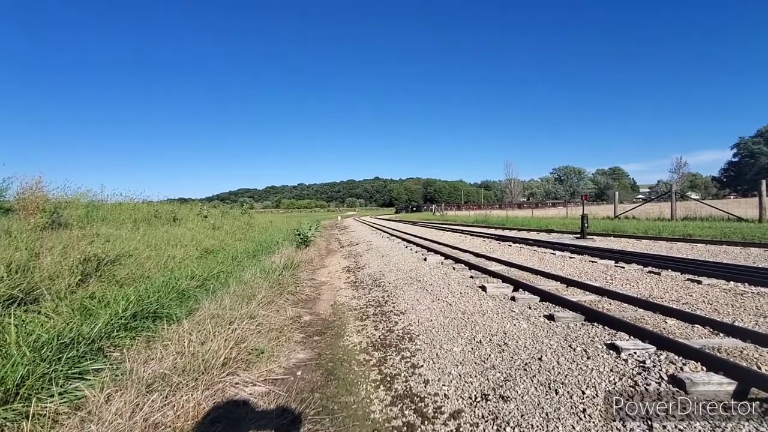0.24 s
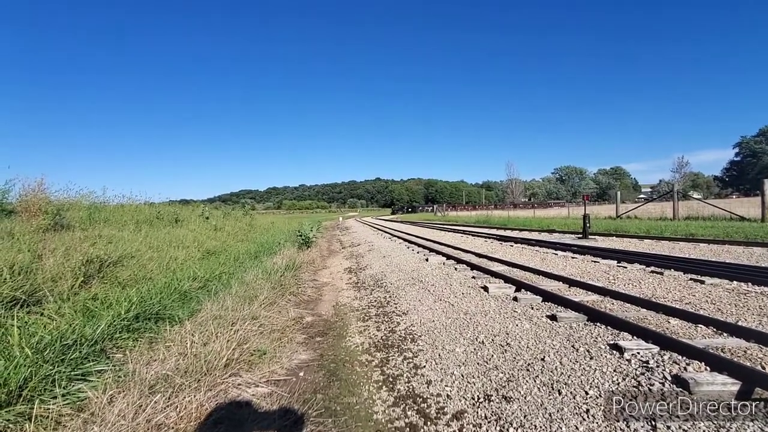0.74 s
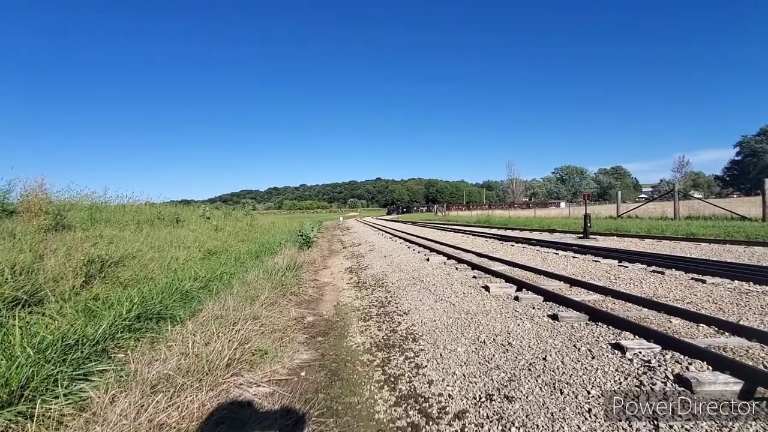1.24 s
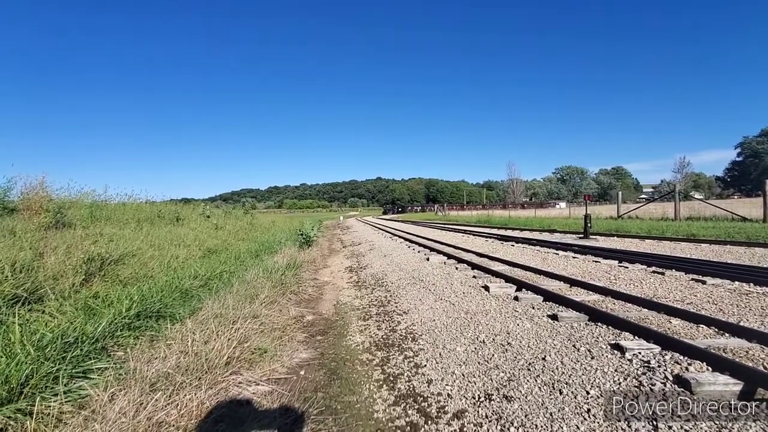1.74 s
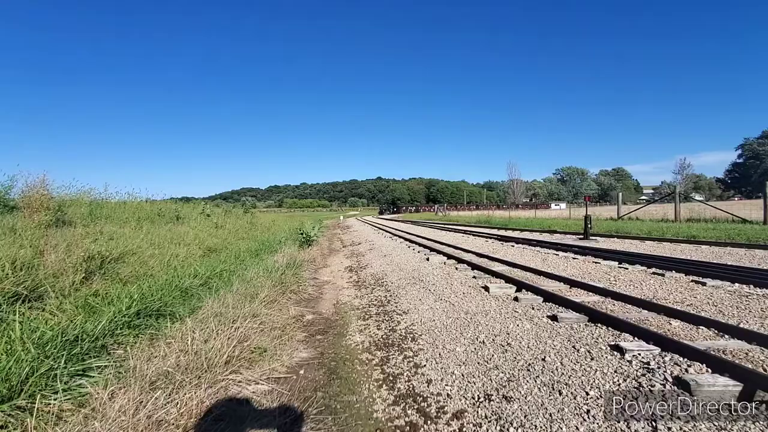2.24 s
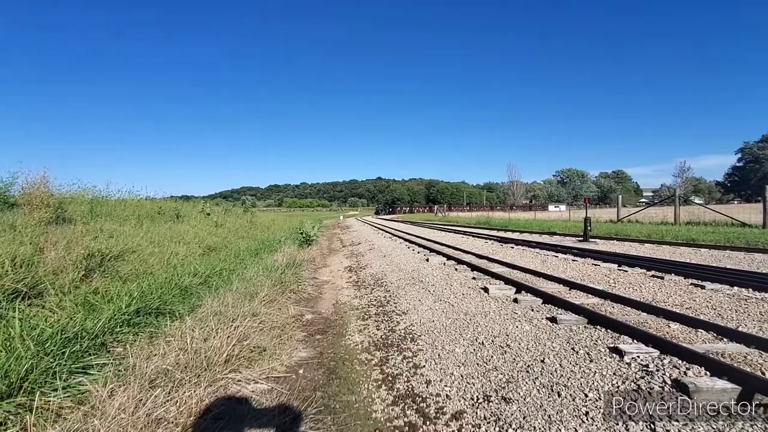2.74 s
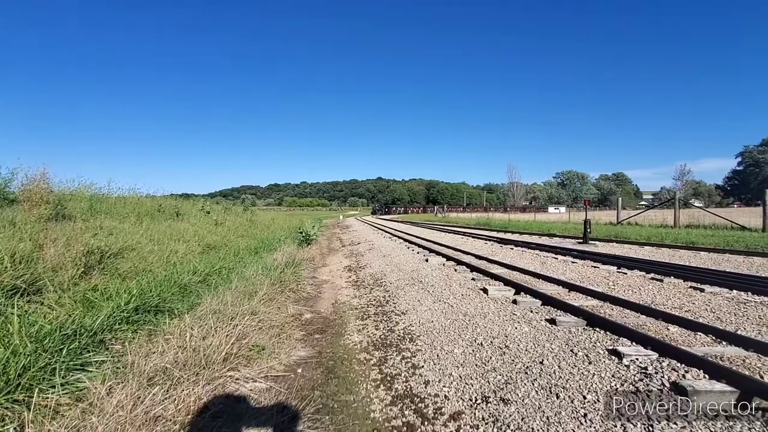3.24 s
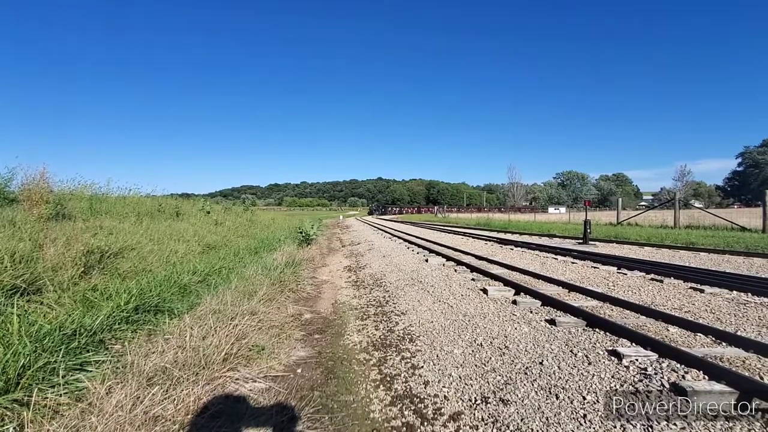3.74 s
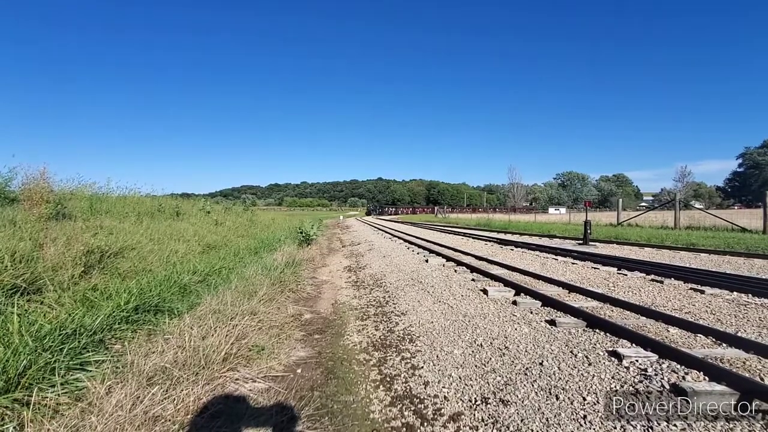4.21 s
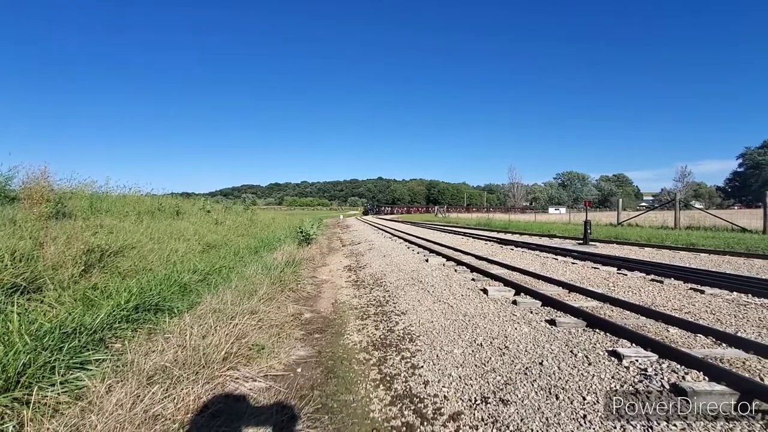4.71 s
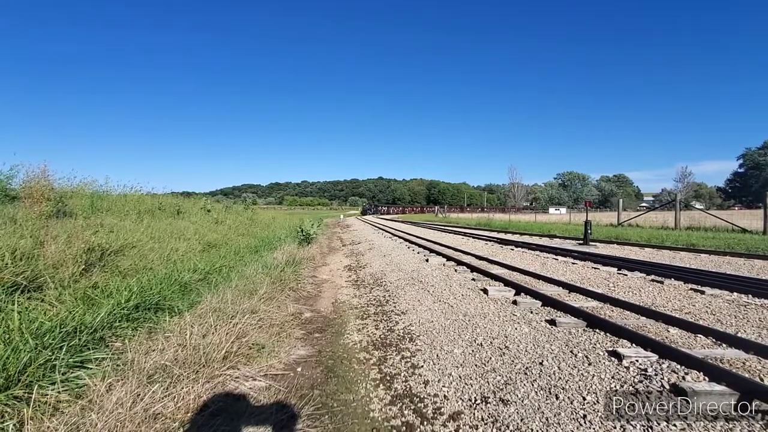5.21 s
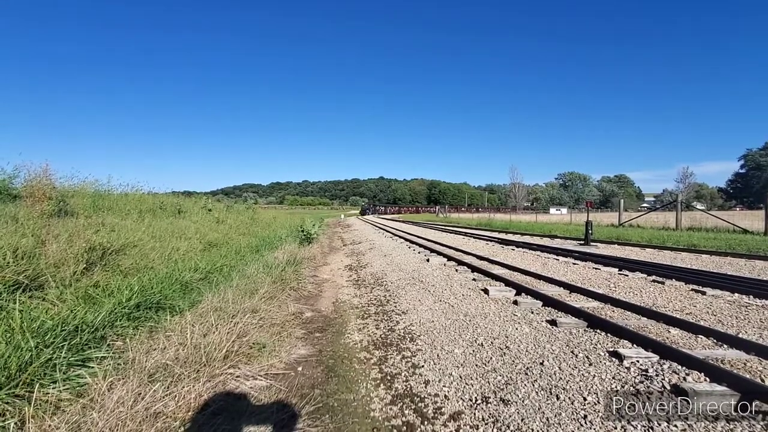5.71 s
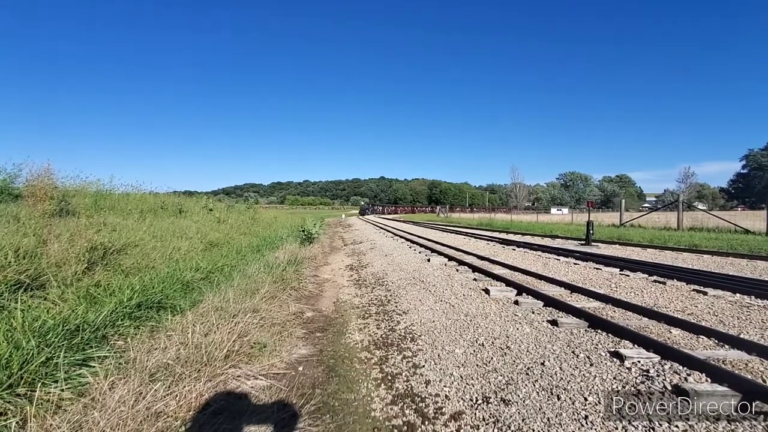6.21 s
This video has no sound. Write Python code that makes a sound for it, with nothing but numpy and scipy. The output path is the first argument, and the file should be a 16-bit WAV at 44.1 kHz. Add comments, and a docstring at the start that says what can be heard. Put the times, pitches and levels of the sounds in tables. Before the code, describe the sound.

Fast, soft chuffing of a far-off steam locomotive grows louder with hissing steam, over low wind thumps, rustling grass, chirps and thin insect trills.

```python
"""A steam train rolls and puffs from the start, about ten puffs a second and slowing a little: shaped noise.
Early on, a gust of noise rustles the grass and dies away over a faint low drone, which later drops.
Birds chip and whistle throughout, and insects trill until nearly five seconds: short gliding tones.
From about one second, bursts of low noise are wind striking the two microphone ports, hardest near four.
After four seconds the train nears: its puffs grow and noisy spurts and leaks of steam come through."""
import sys
import numpy as np
from scipy import signal
from scipy.fft import rfft, irfft
from scipy.io import wavfile
from scipy.ndimage import uniform_filter1d

SR = 44100
rng = np.random.default_rng(int(sys.argv[2]) if len(sys.argv) > 2 else 0)


def to_wav(sig):
    """Store sig (one row per channel, or 1-D mono) as 16-bit WAV at the path in sys.argv[1].

    Samples outside -1..1 are clipped; the rate is SR.
    """
    pcm = np.clip(np.atleast_2d(sig), -1, 1) * 32767
    pcm = np.round(pcm).astype(np.int16)
    wavfile.write(sys.argv[1], SR, pcm.T)  # frames by channels


N = 284886
TIME = np.arange(N) / SR  # [s]

# low drone, one hum a row: (pitch [Hz], width [Hz], level [dB])
DRONE_HUMS = [(75, 18, -41.5), (146, 10, -47.5), (312, 12, -51)]
# fading of the drone: (time [s], gain [dB])
DRONE_FADE = [(1.2, 0), (2.7, -2), (3.3, -12)]

# quiet sound of the field: (frequency [Hz], relative strength [dB per Hz])
FIELD_SPECTRUM = [(100, 10), (500, 3), (1200, -24), (2300, -51), (3000, -17.5), (4500, -18), (6200, -24),
                  (8300, -11), (9500, -25), (12000, -36), (15500, -22)]
# likeness of the field at the two ports: (frequency [Hz], likeness [0-1])
FIELD_LIKENESS = [(100, 0.88), (700, 0.93), (1500, 0.25), (3000, 0.066), (15000, .05)]

# start times of a near bird's double chips: (time [s])
CHIP_TIMES = [0.411, 1.105, 1.534, 2.536, 2.997, 3.511, 4.015, 4.41, 4.81, 5.217, 5.655]
CHIP_DB = -44.5  # the second chip of each pair
# distant bird notes:
# (time [s], length [s], start pitch [Hz], end pitch [Hz], level [dB], lead at the left port [ms])
BIRD_NOTES = [(0.75, .034, 3130, 3130, -36.5, 0.1), (.792, 0.024, 3150, 3100, -40, 0.16),
              (0.853, .03, 3030, 2970, -43, 0.23), (0.887, 0.034, 3420, 3580, -40, .18),
              (0.996, 0.031, 1320, 1334, -44, 0), (1.16, 0.026, 3070, 3170, -38.5, 0.1),
              (1.443, .049, 3470, 3485, -44, 0.19), (1.503, 0.05, 3706, 3694, -45.5, 0.044),
              (1.569, .046, 1300, 1330, -48, 0.037), (1.903, 0.014, 2920, 3100, -44.5, .1),
              (2.117, 0.054, 3560, 3390, -50, .18), (2.294, .043, 3500, 3510, -56.5, 0.063),
              (2.787, 0.038, 3730, 3630, -52, .03), (2.837, .057, 3220, 3000, -56, .13),
              (2.935, .064, 3690, 3640, -45.5, 0.08), (3.016, 0.083, 3590, 3670, -49, .16),
              (3.455, .06, 5000, 3600, -59, 0.026)]

# two insects: (stroke length [s], start pitch [Hz], end pitch [Hz], level before chance and fading [dB])
INSECTS = [(.028, 7800, 6950, -55), (.021, 8400, 8000, -56)]
# bouts of trilling: (which insect [0 or 1], first stroke [s], end [s], rate [strokes per s])
TRILLS = [(0, .035, 1.65, 15.85), (0, 2.056, 4.6, 15.8), (1, 1.195, 2.08, 16.35), (1, 2.75, 4.9, 16.75)]
# how a stroke fades, and how strokes differ by chance; detune and stretch are shares of pitch and length
STROKE_FADE_DB, STROKE_JITTER_S, STROKE_UNEVEN_DB = -11, 0.0018, 2.2
STROKE_DETUNE, STROKE_STRETCH = 0.007, 0.13

# steady wind: (time [s], level [dB], likeness of the two ports [0-1], left over right [dB])
WIND_COURSE = [(0, -39, 0.65, 0), (1, -37, 1, -0.5), (2.1, -36.5, 0.53, 1), (2.8, -35.5, 1, 0),
               (3.2, -43, 0, 19), (3.6, -39.5, 0.1, -1), (4, -42, 0.06, -28.5), (4.25, -42.5, 0, 3.5),
               (5.3, -37, 0, 0), (6.15, -50, .05, 26), (6.46, -34, 0.3, -11)]
# wind buffets: (time of the peak [s], level [dB], length [s], left over right [dB])
BUFFETS = [(0.988, -31.5, 0.078, 0), (1.577, -22, 0.027, 2), (1.927, -24.5, 0.034, 3),
           (2.102, -34.5, 0.09, 10), (2.246, -30.5, 0.081, -1), (2.398, -37, 0.035, 6),
           (2.77, -41, 0.06, 3), (3.17, -28.5, 0.043, 1), (3.329, -36, 0.034, 11), (3.45, -30, 0.028, 8),
           (3.539, -26, 0.12, -1), (3.726, -26.5, 0.081, 3), (3.976, -21, 0.028, 0.5),
           (4.017, -20.5, 0.056, 0.5), (4.1, -19, 0.045, -3), (4.471, -29.5, 0.1, 0),
           (4.845, -21, 0.043, 3), (5.164, -22, 0.071, 2), (5.321, -26.5, 0.26, 2.5),
           (5.455, -21.5, 0.061, 1.5), (5.849, -25, 0.11, 0)]
# steady wind: (frequency [Hz], relative strength [dB per Hz])
RUMBLE_SPECTRUM = [(15, -49), (30, -45), (50, -5.5), (80, 1.5), (120, -6.5), (180, -11.5), (300, -24.5),
                   (2000, -70)]
# wind buffets: (frequency [Hz], relative strength [dB per Hz])
THUMP_SPECTRUM = [(15, -28), (35, -8.5), (75, 9.5), (120, -4), (200, -5.5), (320, -20.5), (600, -27),
                  (5000, -72)]

# a gust in the grass: (time [s], rustle level [dB], fine fizz level [dB])
GRASS_COURSE = [(0, -40.5, -49), (.11, -41, -52.5), (.23, -38, -46.5), (.33, -37, -40.5),
                (.445, -38.5, -41.5), (.65, -44, -49.5), (.75, -42, -48.5), (.97, -45, -50.5),
                (1.12, -43, -44), (1.32, -48.5, -43.5), (1.45, -52, -54), (1.54, -48, -52),
                (1.75, -54, -62), (2.4, -54.5, -79), (3.4, -57.5, -83)]
# body of the rustle: (frequency [Hz], relative strength [dB per Hz])
RUSTLE_SPECTRUM = [(500, -34), (1000, 0), (1600, 6.5), (2200, 8.5), (2900, 9), (4000, -7), (8000, -16)]
# fine fizz of the grass: (frequency [Hz], relative strength [dB per Hz])
FIZZ_SPECTRUM = [(1500, -6.5), (3800, 6), (4400, 6), (5100, 0), (5600, -4.5), (8500, -6), (11000, -4.5),
                 (13000, -16.5)]

# spurts of steam, about one to a beat once the train is near: (time [s], level [dB])
STEAM_SPURTS = [(3.829, -56), (3.923, -49), (4.02, -47.5), (4.13, -46), (4.233, -48.5), (4.333, -41),
                (4.443, -38.5), (4.545, -42.5), (4.648, -42), (4.747, -37.5), (4.856, -37.5), (4.961, -42),
                (5.07, -42), (5.166, -39.5), (5.27, -42), (5.38, -40.5), (5.482, -44), (5.585, -38.5),
                (5.692, -38), (5.794, -42.5), (5.905, -37), (6.008, -33.5), (6.115, -33.5), (6.224, -35),
                (6.322, -34.5), (6.425, -30)]
# unbroken leak of steam: (time [s], level [dB])
STEAM_LEAK = [(0, -77), (3.65, -68), (4, -69), (4.38, -47.5), (4.8, -47.5), (5.4, -50), (5.9, -43),
              (6.3, -38.5), (6.46, -29.5)]
# steam: (frequency [Hz], relative strength [dB per Hz])
HISS_SPECTRUM = [(500, -9), (1400, -4), (2800, -3.5), (3500, 2), (4800, -3.5), (6400, -0.5), (9000, -5.5),
                 (11000, -4), (12500, -11), (15500, -11.5)]

# the train draws near: (time [s], puff level [dB], rolling level [dB], gain above about 1000 Hz [dB])
APPROACH = [(0, -39.5, -41, -8), (.8, -39, -40, -6.5), (1.3, -39, -40, -45), (2, -40.5, -48.5, -11.5),
            (2.85, -40.5, -48, -7), (3.38, -43.5, -50.5, -13.5), (3.8, -40, -56, -6.5),
            (4.3, -35, -42.5, -7), (5.1, -33, -36, -4.5), (5.6, -35, -36, 4), (6.46, -30, -31, -1.5)]
# puffs and rolling: (frequency [Hz], relative strength [dB per Hz])
EXHAUST_SPECTRUM = [(100, -3.5), (450, -4.5), (700, 0), (1000, -11), (1500, -12), (2300, -18.5),
                    (3000, -7.5), (6000, -38.5), (12000, -65)]
# four beats of one turn of the driving wheels: (lateness [s], accent [dB])
WHEEL_TURN = [(-0.0055, -0.6), (0.0013, -0.6), (0.015, -1.5), (-0.0063, 1.3)]
# the beats slow evenly: each gap is a little longer than the one before
FIRST_BEAT_S, BEAT_GAP_S, GAP_GROWTH_S = 0.0251, 0.09711, 0.000143
BEAT_JITTER_S, BEAT_UNEVEN_DB = 0.002, 0.5  # chance differences from beat to beat

# likeness of the train at the two ports: (frequency [Hz], likeness [0-1])
TRAIN_LIKENESS = [(300, 0.88), (450, 0.95), (1000, 0.94), (1230, 0.9), (1550, 0.9), (1850, 0.75),
                  (2150, 0.75), (2450, 1), (2900, 1), (4700, 0.76), (6300, 1), (8600, 0), (11000, 0.4),
                  (14000, 0.86)]
# side the train leans to: (frequency [Hz], left over right [dB])
TRAIN_SIDE = [(1500, 2), (2050, -4), (3000, 0.5), (4600, 4), (7000, 4), (14000, 2)]
# the left port hears the train sooner, bent by the recorder's body: (frequency [Hz], left lead [radians])
TRAIN_PHASE = [(150, 0), (600, 0.39), (1500, 0.9), (1950, 0.8), (2200, 2.5), (2500, 1.5), (2750, 2.5),
               (3150, 3.5), (4050, 5.5), (4700, 3.5), (5900, 6), (8300, 9.5), (10000, 7.5), (12000, 10.5)]
# resonances that colour sound on its way: (frequency [Hz], width [Hz], lift before scaling [dB])
RESONANCES = [(312, 26.5, 14.5), (554, 58.5, 12.5), (803.2, 52, 9.5), (1067, 223, 11.5), (1511, 130, 8.5),
              (1650, 60, 9.5), (2117, 182, 14.5), (2370, 145, 9.5), (3490, 160, 6), (4110, 280, 12),
              (4790, 350, 8), (5180, 210, 11), (5580, 130, 8), (6230, 310, 11.5), (6660, 170, 2)]
EDGE_HZ = 15550  # top of the recorder's range


def amp(db):
    """Turns decibels into a gain."""
    return 10 ** (np.asarray(db) / 20)


def evened(x):
    """Scales a sound to an average strength (rms) of 1."""
    return x / np.sqrt(np.mean(x ** 2) + 1e-20)


def read(points, hz):
    """Reads a frequency table between its rows, on a log-frequency axis."""
    f, value = np.transpose(points)
    return np.interp(np.log(hz + 1), np.log(f + 1), value)


def curves(rows):
    """Draws each column of a time table as a curve, sample by sample."""
    s, *columns = np.transpose(rows)
    return [np.interp(TIME, s, column) for column in columns]


def add(mix, s, sound):
    """Mixes a sound in at time s, cut off at the end of the mix."""
    part = mix[..., max(round(s * SR), 0):][..., :sound.shape[-1]]
    part += sound[..., :part.shape[-1]]


def pan(db):
    """Left and right gains for a level difference."""
    return amp([[db / 2], [-db / 2]])


def drift(rate_hz):
    """Slow random wandering of rms 1: noise with its fast changes removed."""
    f = np.fft.rfftfreq(N, 1 / SR)
    spectrum = rfft(rng.standard_normal(N))
    return evened(irfft(spectrum * np.exp(-(f / rate_hz) ** 2), N))


def resonant_lift(hz):
    """Adds up the lift in dB of the resonances, each a smooth peak."""
    return sum(db / (1 + (2 * (hz - f) / width) ** 2) for f, width, db in RESONANCES)


def noise(spectrum, same, side=None, lead_ms=0, phase=None, patchy_db=0, coloured=0, size=2048):
    """Noise at two ports; the left may lead in time or phase, and moving air makes patches in it."""
    hz = np.fft.rfftfreq(size, 1 / SR)
    a, b, c, d, patches = rng.standard_normal((5, 4 * N // size + 5, len(hz)))
    # smooth the patches over time, then over frequency
    patches = uniform_filter1d(patches, size=5, axis=0)
    patches = evened(uniform_filter1d(patches, size=10, axis=1))
    right, separate = a + 1j * b, c + 1j * d
    alike = np.clip(read(same, hz), 0, 1)
    lead = read(phase, hz) if phase else 2 * np.pi * hz * lead_ms / 1000
    left = (alike * right + np.sqrt(1 - alike ** 2) * separate) * np.exp(1j * lead)
    lean = amp(read(side, hz) / 2) if side else 1
    level_db = read(spectrum, hz) + coloured * resonant_lift(hz) + patchy_db * patches
    frames = np.array([left * lean, right / lean]) * amp(level_db)
    # overlap the short spectra to make one unbroken sound
    sound = signal.istft(frames.swapaxes(1, 2), nperseg=size, noverlap=size - size // 4)[1]
    return evened(sound[:, :N])


def whistle(length, start_hz, end_hz, arch_hz=0, waver_hz=0):
    """One near-sine note that swells and fades, gliding along an arch with an unsteady pitch."""
    u = np.linspace(0, 1, int(length * SR))
    waver = evened(uniform_filter1d(rng.standard_normal(len(u)), size=160))
    hz = start_hz + (end_hz - start_hz) * u + arch_hz * np.sin(np.pi * u) + waver_hz * waver
    tone = np.sin(2 * np.pi * np.cumsum(hz) / SR)
    return np.sqrt(2) * np.sin(np.pi * u) * tone


def outdoors(x, wet_db, t60):
    """Scatter from grass and trees: a noise tail, different at each port, that falls 60 dB in t60 seconds."""
    t = np.arange(SR // 2) / SR
    tail = rng.standard_normal((2, len(t))) * amp(-60 * t / t60)
    tail = tail / np.linalg.norm(tail[0])
    scatter = signal.fftconvolve(np.atleast_2d(x), tail, axes=1)[:, :N]
    return x + amp(wet_db) * scatter


def puffs(events, rise, hold, decay):
    """The level of a run of puffs: the valve opens, blows for a moment, and the cylinder empties."""
    t, power = np.arange(SR // 2) / SR, np.zeros(N)
    opening = np.sin(np.pi / 2 * np.minimum(t / rise, 1)) ** 2
    emptying = np.exp(-np.maximum(t - hold, 0) / decay)
    for s, db in events:
        add(power, s - rise / 2, (amp(db) * opening * emptying) ** 2)
    return np.sqrt(power)


def drone():
    """A faint, wavering low drone from far off: each hum is a tone whose strength and phase drift."""
    fade_db, = curves(DRONE_FADE)
    hums = np.zeros(N)
    for hz, width, db in DRONE_HUMS:
        angle = 2 * np.pi * hz * TIME
        hum = drift(width / 2) * np.cos(angle) + drift(width / 2) * np.sin(angle)
        hums += amp(db) * hum
    return hums * amp(fade_db)


def field():
    """The steady quiet of the field: soft noise, mostly different at the two ports in the treble."""
    return noise(FIELD_SPECTRUM, FIELD_LIKENESS, patchy_db=1.5, coloured=0.44, size=1024) * amp(-46.5)


def insects():
    """Even trills: each wing stroke fades as its pitch drops, with a weaker tone an octave above."""
    out = np.zeros(N)
    for which, start, end, per_s in TRILLS:
        length, top_hz, low_hz, db = INSECTS[which]
        for s in np.arange(start, end, 1 / per_s):
            late, sharp, loud, long = rng.standard_normal(size=4)
            high, low = np.array([top_hz, low_hz]) * (1 + STROKE_DETUNE * sharp)
            span = length * np.exp(STROKE_STRETCH * long)
            arch = (high - low) / 4
            stroke = whistle(span, high, low, arch, waver_hz=30)
            stroke = stroke + amp(-15) * whistle(span, 2 * high, 2 * low, 2 * arch)
            fade_db = np.linspace(0, STROKE_FADE_DB, len(stroke))
            level = amp(db + STROKE_UNEVEN_DB * loud + fade_db)
            add(out, s + STROKE_JITTER_S * late, level * stroke)
    return outdoors(out, wet_db=-9, t60=0.037) * pan(3)


def birds():
    """A near bird chips in pairs and others whistle from the trees: short notes that glide or waver."""
    near, far = np.zeros(N), np.zeros((2, N))
    for s in CHIP_TIMES:
        add(near, s, amp(CHIP_DB - 4.5) * whistle(0.016, 5220, 5020, arch_hz=90))
        add(near, s + 0.0366, amp(CHIP_DB) * whistle(0.0207, 5380, 5000, arch_hz=167))
    for s, length, start_hz, end_hz, db, lead_ms in BIRD_NOTES:
        note = amp(db) * whistle(length, start_hz, end_hz, waver_hz=34.6)
        add(far[0], s, note)
        add(far[1], s + lead_ms / 1000, note)
    far = outdoors(far, wet_db=-5, t60=0.36)
    return outdoors(near, wet_db=-13, t60=0.12) + far


def wind():
    """Lumpy low rumble, and single eddies that strike the two ports unequally."""
    wind_db, same, lean_db = curves(WIND_COURSE)
    apart, same = [(100, 0)], np.clip(same, 0, 1)  # apart: nothing in common at any frequency
    left, other = noise(RUMBLE_SPECTRUM, apart)
    right = same * left + np.sqrt(1 - same ** 2) * other
    lean = amp(lean_db / 2)
    rumble = np.array([left * lean, right / lean]) * amp(wind_db + 2.0 * drift(21))
    eddies = np.zeros((2, N))
    for s, db, length, side_db in BUFFETS:
        add(eddies, s - length / 2, amp(db) * pan(side_db) * np.hanning(int(length * SR)))
    churn = noise(THUMP_SPECTRUM, apart)
    # even out the churn so that each eddy delivers its full push
    churn = churn / np.sqrt(uniform_filter1d(churn ** 2, size=1800) + 1e-9)
    return rumble + eddies * churn


def grass():
    """A gust rustles the dry grass in brief, broad flickers of noise and dies away."""
    rustle_db, fizz_db = curves(GRASS_COURSE)
    rustle = noise(RUSTLE_SPECTRUM, TRAIN_LIKENESS, lead_ms=0.084, patchy_db=1.5, coloured=0.9, size=512)
    fizz = noise(FIZZ_SPECTRUM, [(4500, 0.75), (12000, 0.31)], lead_ms=0.16, patchy_db=3.5, size=512)
    gust = rustle * amp(rustle_db) * pan(-1.2) + fizz * amp(fizz_db) * pan(4.0)
    return gust * amp(drift(22) / 2)


def steam():
    """Escaping steam hisses: round spurts, about one to a beat once the train is near, over a growing leak."""
    leak_db, = curves(STEAM_LEAK)
    spurts = puffs(STEAM_SPURTS, rise=0.018, hold=0.048, decay=0.028)
    hiss = noise(HISS_SPECTRUM, TRAIN_LIKENESS, TRAIN_SIDE, phase=TRAIN_PHASE, patchy_db=2.5, coloured=0.83)
    return hiss * np.hypot(spurts, amp(leak_db)) * amp(drift(40) / 2)


def exhaust_beats():
    """Four beats to a wheel turn, slowly spreading out: rows of (time [s], accent [dB])."""
    rows = []
    for k, (jitter, uneven) in enumerate(rng.standard_normal(size=(64, 2))):
        late, accent_db = WHEEL_TURN[k % len(WHEEL_TURN)]
        s = FIRST_BEAT_S + k * BEAT_GAP_S + GAP_GROWTH_S * k ** 2 / 2
        rows.append((s + late + BEAT_JITTER_S * jitter, accent_db + BEAT_UNEVEN_DB * uneven))
    return rows


def locomotive():
    """Puffs of exhaust from the stack over the steady roll of the train, with a rasp that comes and goes."""
    puff_db, roll_db, rasp_db = curves(APPROACH)
    barks = amp(puff_db) * puffs(exhaust_beats(), rise=0.025, hold=0.05, decay=0.034)
    level = np.hypot(barks, amp(roll_db))
    roar = noise(EXHAUST_SPECTRUM, TRAIN_LIKENESS, TRAIN_SIDE, phase=TRAIN_PHASE, patchy_db=1.5, coloured=1.174)
    roar = roar * level
    rasp = signal.sosfiltfilt(signal.butter(2, 1000, "high", fs=SR, output="sos"), roar)
    return roar + (amp(rasp_db) - 1) * rasp  # turns the rasp up or down within the roar


def scene():
    """The life of the field, the wind and the train, added together."""
    background = drone() + field() + insects() + birds()
    moving_air = wind() + grass()
    train = steam() + locomotive()
    return background + moving_air + train


def record(dry):
    """The recorder's band limit: a filter that removes the highest treble."""
    band_limit = signal.firwin(511, EDGE_HZ, window=("kaiser", 9), fs=SR)
    return signal.oaconvolve(dry, band_limit[None], "same")


dry = scene()
out = record(dry)
to_wav(out)
```